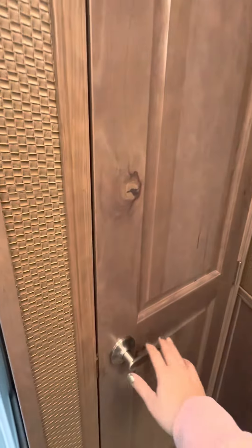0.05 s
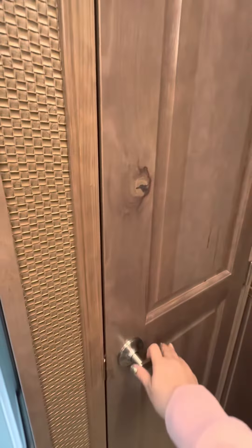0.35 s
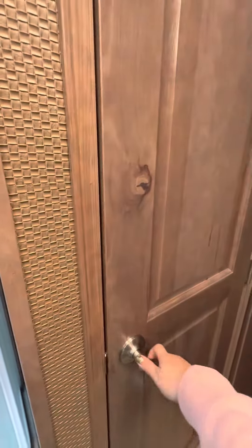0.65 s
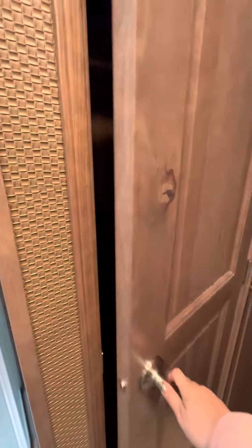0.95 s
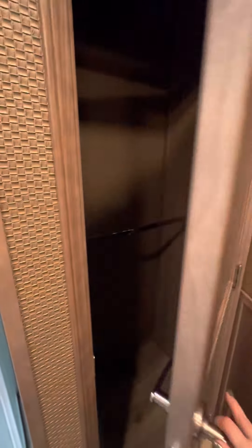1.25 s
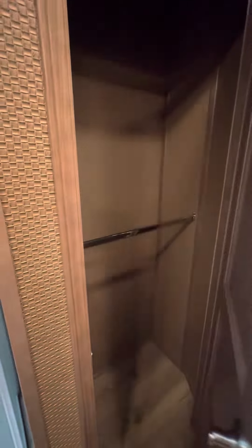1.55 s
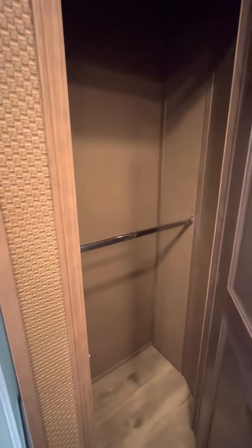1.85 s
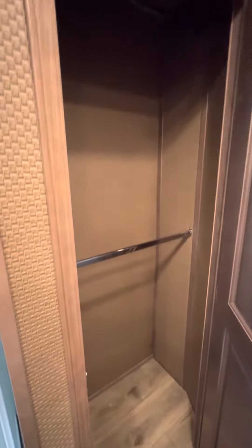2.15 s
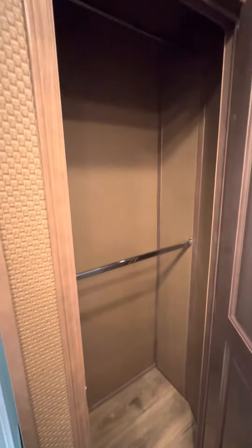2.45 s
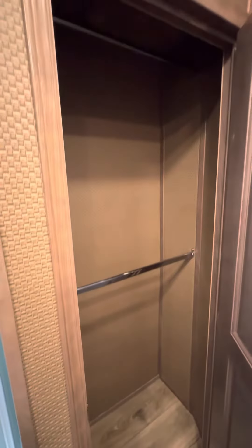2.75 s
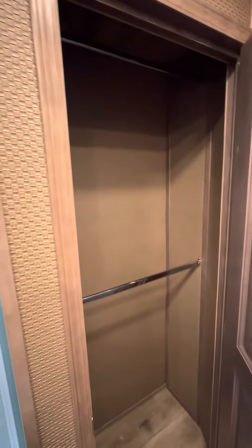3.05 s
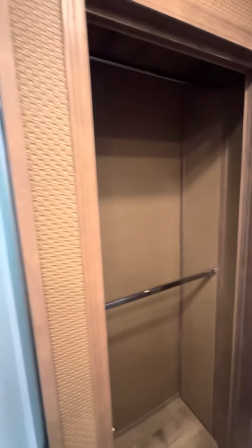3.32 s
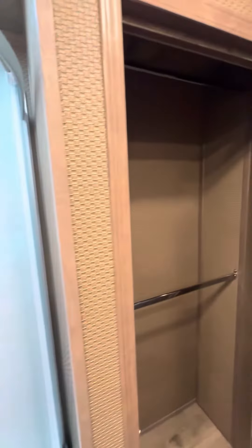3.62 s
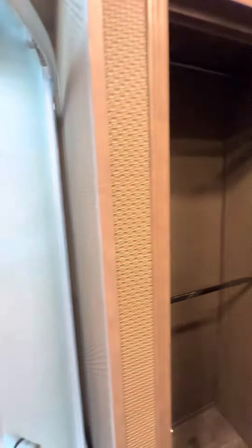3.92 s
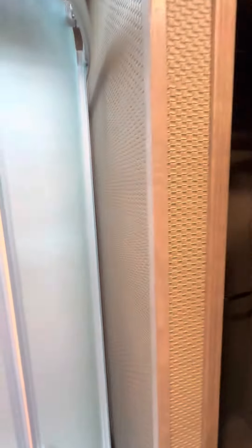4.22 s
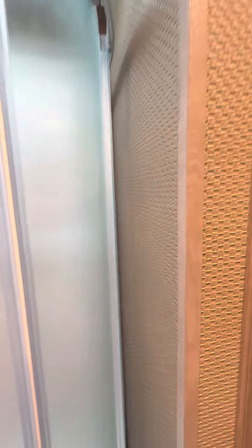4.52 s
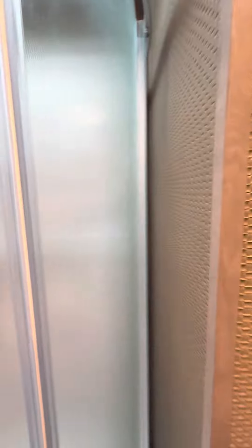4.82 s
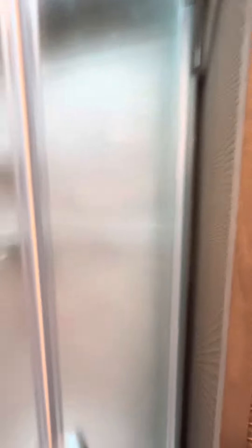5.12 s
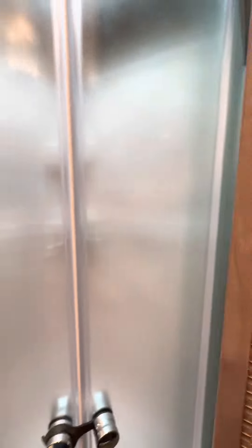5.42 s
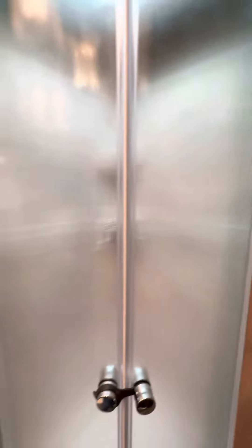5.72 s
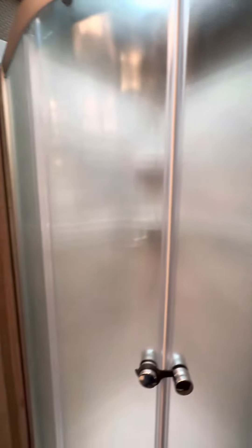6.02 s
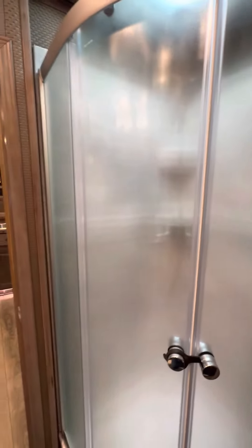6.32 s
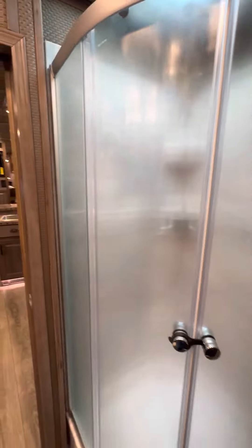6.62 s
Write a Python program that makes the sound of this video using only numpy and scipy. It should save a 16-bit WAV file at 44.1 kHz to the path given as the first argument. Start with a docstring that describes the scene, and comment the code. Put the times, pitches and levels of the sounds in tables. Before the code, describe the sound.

A metal handle clacks and a wooden closet door knocks open, then a glass shower door squeaks, slides and slams against its stop.

```python
"""In a small trailer bathroom a lever handle clacks, the latch draws back and a wooden closet door
swings open with a knock. Then a curved glass shower door jerks loose, squeaks along its track and slams
against its stop. Impacts excite the damped modes of wood, glass and metal; stick-slip friction makes
the scrapes and squeaks; close walls add a short reverberation. Clothes swish and feet shuffle near the
microphone, with dull bumps on the hollow floor, over a low room rumble."""
import sys
import numpy as np
from scipy import signal
from scipy.fft import rfft, irfft, next_fast_len
from scipy.io import wavfile
from scipy.ndimage import map_coordinates

SR = 44100
rng = np.random.default_rng(int(sys.argv[2]) if len(sys.argv) > 2 else 0)


def log_audio(samples):
    """Write samples as a 16-bit WAV file to the path given in sys.argv[1]."""
    # one column per channel
    frames = np.atleast_2d(samples).T
    # limit to full scale, then quantise
    limited = np.clip(frames, -1, 1)
    pcm = np.round(limited * 32767).astype(np.int16)
    wavfile.write(sys.argv[1], SR, pcm)


N = 302967

# The five bands of an impact: thud, knock, rap, clack and tick.
# Each row: lower edge in Hz, upper edge in Hz, rise time in seconds.
BANDS = [(35, 200, .008), (200, 400, .005), (400, 1500, .002), (1500, 3400, .0006), (3400, 16000, .0002)]
# Impacts on the two doors and the floor. Each row: start in seconds, relative level in dB,
# brightness in dB per band, extra thud in dB, contact time in seconds.
JERK_HITS = [(4.8405, -31.5, 2, -6.5, 0.0003), (4.848, -29, -6.5, -1, 0.0019),
             (4.868, -41.5, 2.5, 5, 0.0019), (4.882, -39.5, -8, -7, 0.002), (4.955, -57, 0.5, -5, 0.0033)]
SLAM_HITS = [(5.013, -40, 4.5, 8, 0.006), (5.0205, -29.5, 0, 19.9, 0.0013),
             (5.0295, -23, -1.95, 7, 0.00031), (5.064, -40, -10.5, 21, .001),
             (5.385, -65, -7.5, 12, 0.0022)]
HAND_HITS = [(.342, -60, -10.5, -1.5, .002), (.377, -56, -8, 1, .001), (.415, -62, -6, 3, .003)]
LATCH_HITS = [(0.4849, -26, -0.5, -1.5, 0.001), (.604, -47, -1.5, 7.5, 0.0011),
              (0.646, -43, 2, -8.5, 0.00023), (0.7108, -48, 6, -13.5, 0.00081),
              (.736, -32.5, 3.5, -6.5, 0.00062)]
KNOCK_HITS = [(.742, -43.5, -9, 4.5, 0.0017), (1.124, -53.5, -5, -6.5, 0.001),
              (1.198, -27.5, 0.5, -4, 0.00085), (1.221, -39.5, -3.5, 4.5, .001),
              (1.237, -43, -5.5, -1.5, .001), (1.39, -61, -3.5, -13, 0.02), (1.751, -60, 8, 1, 0.0024)]
FLOOR_HITS = [(1.562, -58, -8, 5, 0.01), (3.529, -42.5, -1, -1, 0.0057), (3.755, -77.5, -18, 20, 0.0084),
              (5.955, -68.5, -17.5, 10.5, 0.011), (6.765, -63.5, -7.5, -11, 0.0095)]
# The shower door's runner chatters on its stop. Each row: start in seconds, relative level in dB.
STOP_HITS = [(5.016, -40), (5.0205, -23), (5.0262, -23), (5.0289, -12)]

# Normal modes of the struck bodies.
# Each row: frequency in Hz, relative level in dB, time to decay by 60 dB (t60) in seconds.
HELD_GLASS_MODES = [(52, -17, .5), (136, 1, 0.28), (264, -6.5, .11), (270, -2, 0.12), (327, -2.5, 0.065),
                    (376, -16, 0.29), (527, -3.5, 0.15), (748, -2.5, .23), (870, 4, .21), (960, 2, 0.12),
                    (3300, 4, .15), (6400, -6, .25)]  # the pane while its seal grips it
GLASS_MODES = [(43, -4.5, 0.38), (52.6, -5, 0.4), (67, -2.5, 0.62), (81, -8, 0.4), (94.2, -6.5, 0.64),
               (112, -6, 0.19), (126.4, 0.5, 0.27), (144.6, 4, 0.34), (168.5, -1.5, 0.27), (210, -17, .38),
               (238, -8.5, 0.39), (267.7, 1, .36), (292, -4, 0.16), (328.4, -4.5, 0.12), (351, -10, 0.17),
               (491.5, -6.5, 0.3), (546, -2.5, 0.28), (842, -0.5, 0.26), (1060, -0.5, 0.14),
               (1705, -6, 0.15), (3010, -0.5, 0.12), (5940, -5.5, .25), (6420, -5.5, 0.28)]  # the freed pane and its frame
STOP_MODES = [(2214, -16, .12), (2436, -17, .12), (2590, -18, .1), (2793, -19, .11), (3170, -20, .12),
              (4615, -28, .22)]
DOOR_MODES = [(62, -10, 0.16), (102.4, -11, 1), (134.2, 8, 0.36), (175.3, 3, .39), (267.5, -1.5, 0.18),
              (303.6, -6, 0.035), (440, -13, 0.26), (505, -17.5, 0.073), (802, -5, 0.15), (910, -6.5, 0.12),
              (1033, 2.5, 0.13), (1153, -1, 0.099), (1687, -1.5, 0.077), (2000, -15.5, 0.043),
              (2550, -8.5, .12), (2774, -4, 0.1), (3080, -5.5, 0.088), (4900, -14, 0.18)]
LEVER_MODES = [(322, -23, 0.13), (367, -35, 0.08), (525, -32, 0.093), (966, -28, 0.081),
               (2580, -28.5, 0.08)]
SPRING_MODES = [(4620, -60.5, .9), (4830, -62, 0.78), (5010, -47, .27), (6400, -59.5, .5), (8300, -59, .45)]
FLOOR_MODES = [(152.2, 3, 0.14), (305, 1, 0.13), (437.6, -11, 0.23), (593, -10.5, 0.26), (993, 11, 0.073),
               (1565, -7, 0.11), (2000, -17, 0.061)]
# Resonances of scraped wood. Each row: frequency in Hz, bandwidth in Hz, relative level in dB.
BOARD_RESONANCES = [(257, 95, 3.5), (450, 110, 1), (782, 68, 0.5), (930, 68, -11), (1050, 50, -6)]

# Squeaks of the shower track. Each row: time of the peak in seconds, frequency in Hz,
# relative level in dB, swell time in seconds, phase waver in radians.
SQUEAKS = [(4.858, 8620, -16, 0.0036, .9), (4.877, 9350, -27, 0.004, 2.3), (4.908, 9750, -20, 0.0067, 1.2)]
# Rasps of the handle's spindle and, last, of the shower door's grip.
# Each row: start in seconds, length in seconds, first pitch in Hz, last pitch in Hz, level in dB.
RASPS = [(0.6, 0.018, 2770, 2500, -47.5), (0.643, 0.011, 2500, 2220, -48), (0.65, 0.034, 1460, 2030, -48.5),
         (0.695, 0.033, 2760, 2930, -47.5), (4.474, 0.042, 1900, 2970, -58)]
# Envelopes of the sliding contacts and of the room's rumble. Each row: time in seconds, level in dB.
ROLL_LEVEL = [(4.6, -69), (4.68, -59.5), (4.83, -49.5), (4.87, -45.5), (4.93, -46.5), (4.97, -38.5),
              (5.02, -37), (5.05, -95)]
BOLT_LEVEL = [(.56, -50), (.6, -49.5), (.615, -47), (.66, -48), (.7, -41), (.735, -44), (.76, -70)]
DRAG_LEVEL = [(1.125, -54.5), (1.14, -49), (1.165, -44), (1.196, -37), (1.21, -75.5)]
HINGE_LEVEL = [(1.46, -100), (1.515, -64.5), (1.56, -70.5), (1.64, -90)]
RUMBLE_LEVEL = [(0, -49), (.22, -53), (.55, -41.5), (.82, -46), (1.02, -58), (2.15, -56.5), (2.35, -52),
                (2.55, -56.5), (3.08, -61), (3.3, -55.5), (4.7, -55), (5.35, -48), (6.35, -56),
                (6.87, -53.5)]
# Soft strokes on wood, and of feet and hands. Each row: start in seconds, length in seconds, level in dB.
SCRAPES = [(2.2, 0.32, -59), (2.72, 0.09, -70), (2.82, 0.11, -67), (2.935, 0.066, -68.5)]
SHUFFLES = [(-.2, 1.3, -67), (.25, 0.27, -60.5), (.7, 0.48, -59.5), (1.25, 0.44, -61.5), (1.98, 0.91, -66),
            (2.22, 0.35, -62), (3.0, 2.1, -84.5), (3.73, 0.74, -62), (4.04, 0.23, -61.5),
            (4.2, 0.53, -63.5), (5.15, 0.47, -56.5), (5.6, 0.82, -58), (6.35, 0.9, -60.5)]
# Sleeve swishes. Each row: start in seconds, length in seconds, level in dB,
# fraction of the stroke at which it is fastest.
SWISHES = [(-.4, 1.4, -70, 1), (3.48, 1.2, -71.5, 0.13), (3.84, 0.23, -58.5, 0.39),
           (3.96, 0.17, -52.5, 0.54), (4.05, .7, -63.5, 0.3), (4.2, 0.3, -61, 0.33), (4.69, 0.3, -52, .6),
           (4.95, 0.69, -57, 0.22), (5.34, 0.5, -53.5, 0.27), (5.68, 0.7, -54.5, 0.6),
           (6.43, 0.24, -56, 0.59), (6.58, 0.3, -52.5, 0.46)]
# Scuffs of hands and soles. Each row: start in seconds, length in seconds, level in dB, pitch ratio.
SCUFFS = [(-.05, 0.2, -71.5, 2.27), (0.332, 0.11, -71, 1.1), (2.04, .3, -74, 2), (3.775, 0.19, -65, 0.78),
          (3.905, 0.2, -55.5, 0.85), (4.199, 0.29, -59.5, 1.1), (4.411, 0.085, -57.5, 1),
          (4.449, 0.075, -58, 1.17)]

# Noise colours of the impacts as heard: the first three have a band cut out at 12-14 kHz, and the
# rest fall away by 12 kHz. Each row: frequency in Hz, relative spectral density in dB.
JERK_COLOUR = [(55, -9.5), (90, -15), (135, -6.5), (190, -13.5), (290, -7.5), (450, -25.5), (650, -21.5),
               (970, -16.5), (1500, -25.5), (2400, -28), (3600, -28.5), (5400, -41.5), (7500, -29.5),
               (10300, -39), (13000, -51.5), (15500, -38.5)]
SLAM_COLOUR = [(60, -5.5), (150, -3.5), (205, -18.5), (275, -9), (450, -19), (700, -23.5), (950, -24),
               (1500, -31.5), (2250, -31.5), (2750, -26.5), (3500, -32.5), (4700, -32), (5500, -38),
               (7000, -30), (10400, -41), (12200, -72.5), (15800, -46)]
LATCH_COLOUR = [(35, -46), (60, -11), (124, 3), (202, -13.5), (290, -7), (350, -10.5), (448, -17.5),
                (650, -20), (960, -21), (1120, -30), (1910, -24), (2650, -22), (3940, -27), (4860, -24),
                (8000, -27), (10200, -30.5), (13900, -81), (16000, -24)]
STOP_COLOUR = [(1200, -28.5), (1900, -9), (2250, 1.5), (2700, 0), (3150, -0.5), (3600, -16), (5000, -29),
               (10000, -35.5), (12000, -69.5)]
HAND_COLOUR = [(60, -26), (150, 12), (220, -5), (280, -5), (340, 1), (450, -35), (900, -4), (1500, -36),
               (2600, -21), (4000, -43), (11000, -56), (12000, -80)]
KNOCK_COLOUR = [(60, -8), (175, 3), (270, -8), (340, -10.5), (480, -16), (650, -16.5), (850, -7.5),
                (1050, -7), (1250, -14.5), (1500, -25.5), (2100, -26), (2750, -16.5), (3300, -25),
                (6580, -23.5), (10000, -35.5), (12000, -69)]
FLOOR_COLOUR = [(60, -10), (150, 6), (210, -17.5), (320, -18.5), (480, -9.5), (720, -4), (1000, -11.5),
                (1300, -15.5), (2050, -12.5), (2350, -16.5), (2800, -19.5), (4000, -35), (5500, -40),
                (10000, -49), (12000, -75)]
# Noise colours of friction and of the room as heard.
# Each row: frequency in Hz, relative spectral density in dB.
ROLL_COLOUR = [(60, -16.5), (110, -2.5), (170, -4.5), (300, -14), (520, -20), (800, -16.5), (1250, -23),
               (2000, -33.5), (3300, -27.5), (5400, -47.5), (8000, -32.5), (10400, -73.5)]
BOLT_COLOUR = [(90, -2.5), (150, -18), (230, -8), (450, -7.5), (750, -14), (1600, -23), (2700, -23),
               (3600, -31), (6400, -25), (10000, -38), (12000, -62), (15000, -75)]
DRAG_COLOUR = [(88, -20.5), (150, -10), (275, -2), (349, -10), (600, -19.5), (1000, -13.5), (1540, -22),
               (1900, -29), (2820, -19.5), (4000, -27.5), (10400, -40), (12000, -69.5), (15600, -101),
               (22000, -120)]
HINGE_COLOUR = [(1500, -51), (3200, -6.5), (4400, -12), (5200, -2), (6200, -12), (9000, -18), (12000, -34)]
SHUFFLE_COLOUR = [(120, -37.5), (175, -4.5), (270, 1), (350, -8.5), (560, -8), (700, -17), (900, -15.5),
                  (1400, -27), (2500, -30.5), (5000, -52)]
CLOTH_COLOUR = [(880, -18.5), (1500, -10), (2230, -7), (2720, -0.5), (2950, -1), (5710, -0.5), (7290, 0),
                (9740, -3), (10500, -2.5), (11200, -21.5), (11600, -49.5), (13000, -57)]
SCUFF_COLOUR = [(400, -10), (750, 12.5), (1300, 9), (1800, 3.5), (2600, 3), (3600, -0.5), (7000, -34)]
RUMBLE_COLOUR = [(13, -44.5), (22, -11.5), (35, -6.5), (54, 5), (63, 1.5), (81, -8), (108, -5.5), (135, -6),
                 (190, -22), (250, -39.5), (420, -120)]
HISS_COLOUR = [(180, -7), (300, 3), (500, -7.5), (722, -9), (1810, -7.5), (3340, -7.5), (4500, -3.5),
               (10500, -19.5), (13600, -43.5), (22000, -120)]

# Likeness of the two microphone ports. Each row: frequency in Hz, coherence from 0 to 1.
PORT_COHERENCE = [(100, .999), (300, .98), (600, .8), (1200, .7), (2500, .6), (5000, .3), (9000, .65)]
# Phase between the ports. Each row: frequency in Hz, lead of the left port in radians.
PORT_PHASE = [(100, 0), (300, -.15), (600, -.5), (1200, -.7), (2500, -1.5), (5000, -1.7), (9000, -1.4)]
# Balance of the ports. Each row: frequency in Hz, level of left over right in dB.
PORT_BALANCE = [(90, 0), (170, 1.5), (300, 2.4), (600, .8), (1200, -.5), (2500, -.8), (5000, 0),
                (9000, -1.7)]

TAIL_TOP_HZ = 10900  # upper edge of the impact tails and scuffs
SCUFF_CREST, SCUFF_SHARPNESS = .38, 1.5  # stroke shape of scuffs and scrapes


def shower_door():
    """Impact excitation: the pane rings as it jerks off its seal, rolls, then rings as it slams home."""
    jerk = impacts(JERK_HITS, HELD_GLASS_MODES, JERK_COLOUR, lag_s=.004,
                   crack_t60=[.17, .18, .036, .022, .026], room_t60=[.18, .14, .15, .28, .24],
                   room_db=[-12, -17, -9.5, -13.5, -9], ring_db=[-.5, .5, -15, -22, -23.5],
                   trim_db=[4.5, 1.5, -1.5, -7, -5])
    slam = impacts(SLAM_HITS, GLASS_MODES, SLAM_COLOUR, lag_s=.001,
                   crack_t60=[.2, .27, .043, .015, .017], room_t60=[.42, .34, .25, .25, .3],
                   room_db=[-7, -11, -10.5, -17.5, -16.5], ring_db=[-4, -1.5, -12, -19, -17.5],
                   trim_db=[-.5, 1.5, -1, -4.5, -5])
    return jerk + slam + stop_clacks() + friction(ROLL_LEVEL, ROLL_COLOUR)


def stop_clacks(crack_t60=.015, ring_db=1, rise_s=.00012):
    """Impulse response: each hard touch of the runner makes a brief crack and sets the stop ringing."""
    track, t = np.zeros((2, N)), np.arange(SR // 3) / SR
    for start, db in STOP_HITS:
        clack = noise(STOP_COLOUR, len(t)) * amp(-60 * t / crack_t60)
        clack /= rms(clack[0, :SR // 300])
        for hz, mode_db, t60 in STOP_MODES:
            ring = amp(ring_db + mode_db - 60 * t / t60)
            clack[0] += ring * np.sin(2 * np.pi * (hz * t + rng.random()))
        add(track, start, amp(db) * clack * (1 - np.exp(-t / rise_s)))
    return track


def track_squeaks(gain_db=.5, tail_db=-14.5, tail_t60=.33, flutter_db=4.5):
    """Stick-slip oscillation: dry metal sings briefly, and reverberation holds each note."""
    track, t = np.zeros((2, N)), np.arange(SR // 2) / SR - .03
    for peak_s, hz, db, swell_s, waver in SQUEAKS:
        pulse = np.exp(-.5 * (t / swell_s) ** 2)
        tail = amp(tail_db - 60 * t / tail_t60) * np.clip(t / swell_s, 0, 1)
        flutter = amp(flutter_db * wobble(109, len(t)))
        phase = 2 * np.pi * hz * t + waver * wobble(160, len(t))
        add(track[:1], peak_s + t[0], amp(db + gain_db) * (pulse + tail * flutter) * np.sin(phase))
    return track


def closet_door():
    """Modal vibration: latch, knocks and hand excite one wooden panel; bolt, door and hinge rub."""
    latch = impacts(LATCH_HITS, DOOR_MODES, LATCH_COLOUR, lag_s=.014,
                    crack_t60=[.74, .079, .042, .098, .055], room_t60=[.22, .39, .19, .14, .3],
                    room_db=[-22.5, -12, -4, 1.5, -15], ring_db=[-1, 1, -26, 4, 3],
                    trim_db=[-5, -5, -9, -14.5, -13])
    knocks = impacts(KNOCK_HITS, DOOR_MODES, KNOCK_COLOUR, lag_s=.008,
                     crack_t60=[.51, .056, .037, .11, .028], room_t60=[.1, .2, .18, .17, .3],
                     room_db=[4, -4, -1.5, -6, -12.5], ring_db=[0, 5, -7, -5, -13],
                     trim_db=[-7.5, -5.5, -.5, -9.5, -14.5])
    bolt = friction(BOLT_LEVEL, BOLT_COLOUR)
    drag = friction(DRAG_LEVEL, DRAG_COLOUR)
    hinge = friction(HINGE_LEVEL, HINGE_COLOUR)
    pats = impacts(HAND_HITS, DOOR_MODES, HAND_COLOUR, lag_s=.006,
                   crack_t60=[.16, .14, .06, .073, .06], room_t60=[.2, .22, .32, .35, .2],
                   room_db=[-10, -14, -8, 1, -3], ring_db=[-2, -4, -14, -13, -16],
                   trim_db=[8.5, -4.5, -16, -6, -19])
    return pats + latch + knocks + bolt + drag + hinge


def handle():
    """Free vibration: the first latch contact rings the lever, and the last releases the spring."""
    lever = loose_metal(LATCH_HITS[0][0], LEVER_MODES, waver_rad=.33, waver_per_s=78, rise_s=.0074)
    spring = loose_metal(LATCH_HITS[-1][0], SPRING_MODES, waver_rad=.8, waver_per_s=80, rise_s=.001)
    return lever + spring


def metal_rasps(slips_per_s=450, pitch_scatter=.023, slip_t60=.012):
    """Stick-slip friction: dry metal slips unevenly, each slip ringing at a pitch set by the load."""
    track, t = np.zeros((2, N)), np.arange(SR // 4) / SR
    for start, length, first_hz, last_hz, db in RASPS:
        time_jitter, pitch_jitter, size_jitter = rng.standard_normal((40, 3)).T
        slip_s = (np.arange(40) + time_jitter / 2) / slips_per_s
        hz = np.interp(slip_s, [0, length], [first_hz, last_hz]) * (1 + pitch_scatter * pitch_jitter)
        sizes = np.sin(np.pi * np.clip(slip_s / length, 0, 1)) * amp(2 * size_jitter)
        age = np.maximum(t - slip_s[:, None], 0)
        rasp = sizes @ (amp(-60 * age / slip_t60) * np.sin(2 * np.pi * hz[:, None] * age))
        rasp *= amp(db) / np.sqrt(np.sum(rasp ** 2) / (length * SR))
        add(track, start, walls(np.array([rasp, rasp / 2]), t60=.11, wet_db=2))
    return track


def floor_bumps():
    """Damped resonance: the hollow floor answers soft impacts with short, woody bumps."""
    return impacts(FLOOR_HITS, FLOOR_MODES, FLOOR_COLOUR, lag_s=.0048,
                   crack_t60=[.41, .13, .056, .071, .046], room_t60=[.43, .27, .21, .17, .33],
                   room_db=[-15, -6.5, -9.5, -5.5, 0], ring_db=[3, 1, -6, -15, -12],
                   trim_db=[-3, -7, -1.5, -11.5, -23.5])


def wood_scrapes(rough_db=1.5, slips_per_s=48, top_hz=1180):
    """Forced vibration: something soft drags over wood, and its slips drive a few low resonances."""
    def board(f):
        resonances = sum(amp(db) * 1j * f * width / (hz * hz - f * f + 1j * f * width)
                         for hz, width, db in BOARD_RESONANCES)
        return resonances / (1 + (f / top_hz) ** 8)
    slips = rng.standard_normal((2, N)) * amp(rough_db * wobble(slips_per_s, N))
    return strokes(SCRAPES, SCUFF_CREST, SCUFF_SHARPNESS) * unit(filtered(slips, board))


def body_movements():
    """Friction noise grows with sliding speed: feet shuffle, sleeves swish, hands and soles scuff."""
    shuffles = strokes(SHUFFLES, crest=.31, sharpness=.89) * amp(.72 * wobble(40, N))
    shuffles = shuffles * noise(SHUFFLE_COLOUR, N)
    folds = amp(.4 * wobble(110, N) + .5 * wobble(14, N))
    sleeves = strokes(SWISHES, sharpness=1.11) * folds * noise(CLOTH_COLOUR, N)
    scuffs = np.zeros((2, N))
    for start, length, db, pitch in SCUFFS:
        brushing = noise(np.multiply(SCUFF_COLOUR, [pitch, 1]), N, hi=TAIL_TOP_HZ)
        scuffs += stroke(start, length, db, SCUFF_CREST, SCUFF_SHARPNESS) * brushing
    slips = unit(amp(3 * wobble(260, N)))
    return walls(shuffles + sleeves + scuffs * slips, t60=.085, wet_db=-4.5)


def room_tone(hiss_db=-78.5):
    """Ambient noise: a low rumble rises and falls over a steady, faint hiss."""
    times, db = np.transpose(RUMBLE_LEVEL)
    rumble = amp(np.interp(np.arange(N) / SR, times, db)) * noise(RUMBLE_COLOUR, N)
    return rumble + amp(hiss_db) * noise(HISS_COLOUR, N)


def impacts(hits, modes, colour, lag_s, crack_t60, room_t60, room_db, ring_db, trim_db):
    """Superposition: a blow sums a noisy crack, its reverberation and modes. Settings go by band."""
    track, t = np.zeros((2, N)), np.arange(round(.7 * SR)) / SR
    for start, db, brightness, thud_db, contact_s in hits:
        # a hard contact tilts the sound upward about the middle band; a heavy one adds thud
        levels = db + np.array(trim_db) + np.append(thud_db, brightness * np.arange(-1, 3))
        for band, (lo, hi, rise_s) in enumerate(BANDS):
            sound = noise(colour, len(t), lo, hi) * amp(-60 * t / crack_t60[band])
            room_decay = amp(room_db[band] - 60 * t / room_t60[band])
            sound += noise(colour, len(t), lo, min(hi, TAIL_TOP_HZ)) * room_decay
            for k, (hz, mode_db, t60) in enumerate(modes):
                if lo <= hz < hi:  # neighbouring modes swing opposite ways
                    ring = amp(ring_db[band] + mode_db + rng.normal(0, 1) - 60 * t / t60)
                    sound[0] += (-1) ** k * ring * np.sin(2 * np.pi * hz * t)
            sound *= 1 - np.exp(-t / (rise_s + contact_s))  # soft contacts swell more slowly
            delay = lag_s * BANDS[0][1] / hi  # dispersion: low bending waves travel slowest
            add(track, start + delay, amp(levels[band]) * sound / rms(sound[0, :SR // 25]))
    return track


def friction(envelope, colour, slips_per_s=260):
    """Stick-slip modulation: sliding surfaces catch and release, roughening a band of noise."""
    times, db = np.transpose(envelope)
    t = times[0] + np.arange(SR) / SR
    slips = amp(3.5 * wobble(slips_per_s, SR))
    rub = np.interp(t, times, amp(db), right=0) * unit(noise(colour, SR) * slips)
    track = np.zeros((2, N))
    add(track, times[0], walls(rub, t60=.12, wet_db=-4))
    return track


def loose_metal(start, modes, waver_rad, waver_per_s, rise_s):
    """Phase modulation: loosely held metal rings on with unsteady partials."""
    track, t = np.zeros((2, N)), np.arange(SR) / SR
    for hz, db, t60 in modes:
        phase = 2 * np.pi * hz * t + waver_rad * wobble(waver_per_s, SR)
        add(track[:1], start, amp(db - 60 * t / t60) * np.sin(phase) * (1 - np.exp(-t / rise_s)))
    return track


def stroke(start, length, db, crest, sharpness):
    """Amplitude follows a power of speed: a movement quickens to its crest and slows to rest."""
    turning_s = start + length * np.array([0, np.clip(crest, .05, .95), 1])
    speed = np.sin(np.pi / 2 * np.interp(np.arange(N) / SR, turning_s, [0, 1, 0]))
    return amp(db) * speed ** sharpness


def strokes(table, *shape, **named_shape):
    """Incoherent addition: the powers of overlapping movements sum."""
    return np.sqrt(sum(stroke(*row, *shape, **named_shape) ** 2 for row in table))


def walls(x, t60, wet_db):
    """Reverberation: close walls smear the sound above 700 Hz; its total power is kept."""
    t = np.arange(SR // 4) / SR
    tail = rng.standard_normal((2, len(t))) * amp(-60 * t / t60)
    tail = signal.sosfilt(signal.butter(2, 700, "high", fs=SR, output="sos"), tail)
    tail *= amp(wet_db) / np.linalg.norm(tail[0])
    return unit(x + signal.fftconvolve(x, tail, axes=1)[:, :x.shape[1]]) * rms(x)


def amp(db):
    """Decibels to amplitude ratio."""
    return 10 ** (np.asarray(db) / 20)


def rms(x):
    """Root-mean-square amplitude."""
    return np.sqrt(np.mean(x ** 2) + 1e-30)


def unit(x):
    """Normalisation to rms 1."""
    return x / rms(x)


def along(points, hz):
    """Interpolation of (Hz, value) points on a logarithmic frequency axis."""
    freqs, values = np.transpose(points)
    return np.interp(np.log(hz + 1), np.log(freqs + 1), values)


def wobble(rate, size):
    """Spline interpolation through random knots, rate of them a second."""
    knots = rng.standard_normal(int(size * rate / SR) + 4)
    return map_coordinates(knots, [np.arange(size) * rate / SR])


def filtered(x, response):
    """Linear filtering: the spectrum of x times a frequency response."""
    size = next_fast_len(x.shape[-1] + SR // 10)
    return irfft(rfft(x, size) * response(np.fft.rfftfreq(size, 1 / SR)), size)[..., :x.shape[-1]]


def noise(colour, size, lo=0, hi=SR):
    """Two uncorrelated coloured noises: the direct part (row 0) and the scattered part (row 1)."""
    white = rng.standard_normal((2, size))
    return unit(filtered(white, lambda hz: amp(along(colour, hz)) * (hz >= lo) * (hz < hi)))


def add(track, start, sound):
    """Superposition of a sound on a track, from start in seconds."""
    part = track[:, round(start * SR):][:, :sound.shape[-1]]
    part += sound[..., :part.shape[-1]]


def scene():
    """Partial coherence: direct sound meets both ports alike, scattered in antiphase; right leads."""
    def shares(hz):
        angle = np.arccos(np.clip(along(PORT_COHERENCE, hz), 0, 1)) / 2
        return np.array([np.cos(angle), np.sin(angle)])

    def ports(hz):
        side = np.array([[.5], [-.5]])
        return amp(side * along(PORT_BALANCE, hz)) * np.exp(1j * side * along(PORT_PHASE, hz))

    doors = track_squeaks() + metal_rasps() + closet_door() + handle() + shower_door()
    background = floor_bumps() + wood_scrapes() + room_tone() + body_movements()
    direct, scattered = filtered(doors + background, shares)
    return filtered(np.array([direct + scattered, direct - scattered]), ports)


def record(dry, low_cut_hz=18, ceiling=.95, top_hz=15900):
    """Band limiting and saturation: the phone drops both extremes of pitch and rounds off peaks."""
    bass_cut = filtered(dry, lambda hz: 1 / np.sqrt(1 + (low_cut_hz / (hz + 1)) ** 12))
    rounded = bass_cut / (1 + np.abs(bass_cut / ceiling) ** 8) ** (1 / 8)
    return filtered(rounded, lambda hz: 1 / np.sqrt(1 + (hz / top_hz) ** 120))


dry = scene()
out = record(dry)
log_audio(out)
```